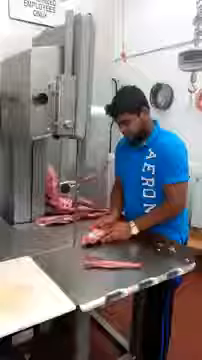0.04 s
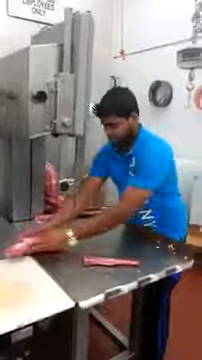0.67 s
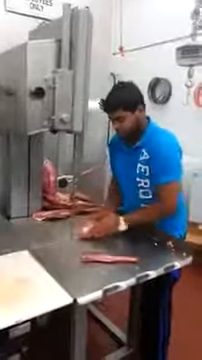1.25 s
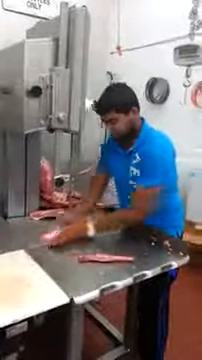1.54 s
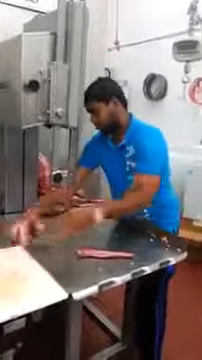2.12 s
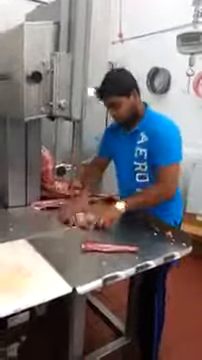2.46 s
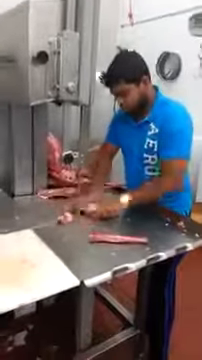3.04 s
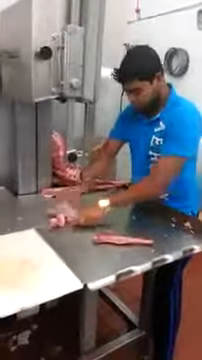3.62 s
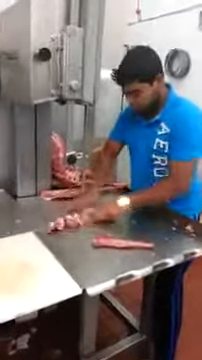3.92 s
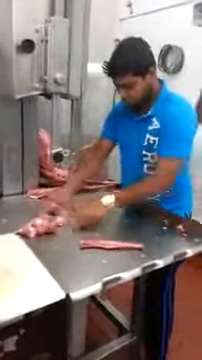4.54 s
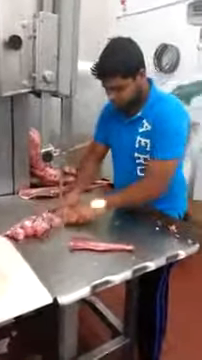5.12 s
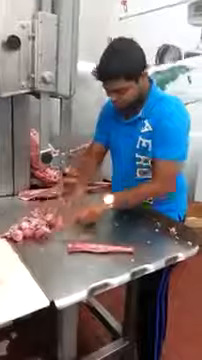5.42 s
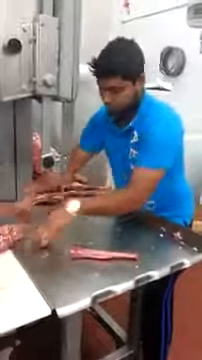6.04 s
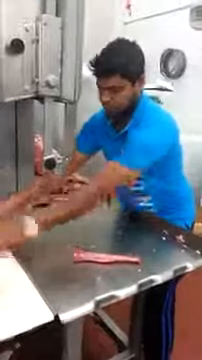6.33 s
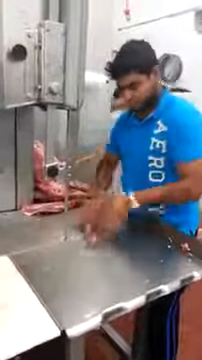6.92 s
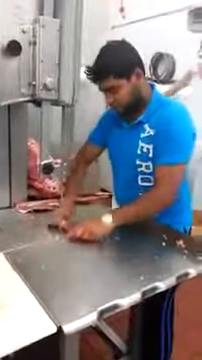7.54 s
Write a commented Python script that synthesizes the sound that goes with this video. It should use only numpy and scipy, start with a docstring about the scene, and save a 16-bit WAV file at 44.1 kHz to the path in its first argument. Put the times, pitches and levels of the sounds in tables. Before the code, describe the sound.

A butcher's band saw drones and hisses while bone is pushed through it in short, squealing rasps, with a few thumps on steel.

```python
"""Butcher's band saw in a tiled room.

The wheels drive the steel cabinet to a drone; belt and bearings whine, the blade hisses and whistles.
Bone is pushed through again and again: teeth rasp, the pinched blade squeals, the loaded drone sinks.
Soft flesh fizzes in the teeth; meat and bone thump on the steel table."""
import sys
import numpy as np
from scipy import signal
from scipy.fft import rfft, irfft, next_fast_len
from scipy.io import wavfile
from scipy.ndimage import uniform_filter1d, map_coordinates

SR = 44100
rng = np.random.default_rng(int(sys.argv[2]) if len(sys.argv) > 2 else 0)


def digitize_waveform(pressure):
    """Quantize a signal to 16-bit integers and store it at the path in sys.argv[1].

    Rows of a 2-D input are taken as channels; values are limited to [-1, 1].
    """
    field = np.atleast_2d(pressure).T
    bounded = np.clip(field, -1, 1)
    quanta = np.round(bounded * 32767).astype(np.int16)
    wavfile.write(sys.argv[1], SR, quanta)


N = 342657
TIME = np.arange(N) / SR

# cabinet drone before the load dip (time [s], level [dB])
FREE_DRONE = [(0.83, -16.5), (1.0, -31.5), (1.14, -16.5), (1.7, -19.5), (2.13, -27.5), (2.3, -14.5),
              (3.4, -16.5), (3.85, -16), (4.17, -13.5), (4.4, -17), (5.83, -18.5), (5.91, -10), (6.11, -9),
              (6.15, -12.5), (6.56, -22), (6.69, -10), (7.25, -10.5), (7.5, -16.5)]
# cabinet panels (frequency [Hz], width [Hz], gain [dB])
PANEL_MODES = [(228.2, 16, -2.5), (258, 19, 1), (288, 27, 7)]
# panel rattle (frequency [Hz], relative density [dB])
RATTLE_SPECTRUM = [(25, -42), (48, -48), (75, -13.5), (110, -15.5), (160, -3.5), (250, -2), (400, 0.5),
                   (460, 3.5), (490, 2.5), (540, 6), (600, 1.5), (650, -4.5), (1000, -0.5), (1250, -10),
                   (2000, -42)]
# bone on the blade (start [s], attack [s], hold [s], rasp [dB], squeal [dB], octave [dB], roughness [0-1])
BONE_CUTS = [ (1.322, .030, .030, -20, -38, -24, .4), (1.385, .035, .018, -10.5, -10.5, -10, .2),
             (1.462, .018, .018, -34, -19, -24, .05), (1.530, .040, .190, -30, -27, -31, .05),
             (1.590, .080, .012, -15, -28, -13.5, .3), (2.480, .010, .015, -28, -34, -33, .9),
             (2.698, .008, .048, -10.5, -14.5, -10.5, .65), (3.137, .004, .018, -8, -19, -11, .85),
             (3.185, .025, .015, -28, -19, -21, .4), (3.528, .005, .042, -12, -12.5, -11.5, .65),
             (3.830, .005, .005, -20, -35, -25, .95), (3.925, .040, .040, -12.5, -16, -20, .75),
             (4.372, .004, .026, -9.5, -17, -8, .7), (4.741, .008, .028, -9, -23, -11, .75),
             (4.870, .050, .090, -27, -29, -25, .15), (5.134, .008, .028, -11.5, -18, -15, .75),
             (5.563, .018, .055, -16.5, -18, -20, .6), (5.660, .030, .060, -30, -33, -21, .1),
             (7.595, .015, .025, -12.5, -14.5, -12, .65), (7.692, .004, .006, -18, -28, -30, .9)]
# teeth on bone (frequency [Hz], relative density [dB])
RASP_SPECTRUM = [(500, -29), (1700, 3.5), (2600, 3.5), (3400, 7), (4000, 12), (4500, 5.5), (5200, 0.5),
                 (7000, -1), (10000, -6), (13000, -4.5), (15000, -14)]
# blade resonances (frequency [Hz], width [Hz], gain [dB])
BLADE_MODES = [(2150, 225, 0), (4290, 260, 0), (6530, 110, -14)]
# higher blade modes that colour the rasp (frequency [Hz], width [Hz], gain [dB])
RASP_MODES = [(6480, 120, -3), (8650, 160, -3), (8950, 200, -4), (10640, 140, -4), (11100, 140, -7),
              (13000, 260, -10)]
# blade in its guides (frequency [Hz], relative density [dB])
HISS_SPECTRUM = [(600, -21.5), (1200, -0.5), (1550, 3.5), (1900, 0.5), (2150, 1), (2420, -2), (2790, 7.5),
                 (3150, 2.5), (3750, 2.5), (4300, -2), (5000, -9), (6500, -14.5), (10000, -21),
                 (12500, -19), (15000, -47)]
# blade pressed sideways on its guide (start [s], hold [s], whistle level [dB])
GUIDE_PRESSES = [(1.44, .14, -33), (2.76, .04, -34), (3.32, .13, -34), (5.17, .08, -34), (5.61, .07, -30)]
# drive tones (frequency [Hz], relative level [dB])
DRIVE_TONES = [(208, -38.5), (221, -29.5), (228, -30), (259, -41), (308, -29.5), (353, -34), (442, -39.5),
               (521, -37.5), (834.4, -35.5), (887, -43), (1007, -46), (1303, -36.5), (2503, -35)]
# wheel bearing whines (low [Hz], high [Hz])
BEARING_HZ = [1087.3, 1671.8]
# wheel bearing whines (time [s], low whine [dB], high whine [dB])
BEARING_LEVELS = [(0.83, -38, -30.5), (1.2, -32, -31), (1.6, -41, -35), (2.3, -32, -31), (2.8, -37, -36),
                  (5.6, -35, -34), (6.3, -26.5, -32), (7.4, -27.5, -30), (7.77, -34, -32.5)]
# meat and bone on the table (time [s], relative level [dB], hardness [0-1])
BLOWS = [(1.169, -13, 1), (2.742, -6.5, 0.14), (3.051, -14, 0), (5.79, -14, .6), (6.893, -14, 1)]
# steel table top (frequency [Hz], gain [dB], T60 [s])
TABLE_MODES = [(205, -29, 0.11), (265, 0.5, 0.22), (328, -23, 0.11), (464, 1, 0.063), (549, 1, 0.05),
               (792, -11.5, 0.13), (1050, -9, 0.054)]
# blade in soft flesh (start [s], end [s], level [dB])
FLESH_SLICES = [(0.805, 1.847, -35.5), (4.553, 5.1, -36), (6.25, 7.2, -43)]
# teeth in flesh (frequency [Hz], relative density [dB])
FIZZ_SPECTRUM = [(3000, -30), (5500, -1), (8000, 0), (11000, 1), (13500, -3), (15000, -2)]
# tiled room (frequency [Hz], T60 [s])
ROOM_DECAY = [(200, 0.3), (2000, 0.33), (5000, 0.43), (14000, 0.35)]
# left-right likeness of the machine noise (frequency [Hz], coherence [0-1])
COHERENCE = [(60, 0.8), (200, 0.95), (320, 0.78), (450, 0.91), (650, 0.51), (1390, 0), (3000, 0.015),
             (14000, 0.1)]

DRONE_HZ, RUMBLE_DB, RATTLE_DB = 294.5, -21, -20.5  # unloaded
SAG_HZ, DRONE_DIP_DB, PANEL_DIP_DB = 3.2, 7.5, 2  # drops at full load
FULL_LOAD_RASP_DB, LOAD_RISE_S, LOAD_HOLD_S, LOAD_FALL_S = -17, 0.032, 0.0849, 0.031
SQUEAL_HZ, DRAG_HZ = 2163, 45  # clean pitch, drop at full roughness
RASP_RELEASE_S, SQUEAL_RELEASE_S = 0.013, 0.018
WHISTLE_HZ, WHISTLE_DB, WHISTLE_SWELL_DB, WHISTLE_T60_S = 3343, -36.5, 7, 1.6
ONSET_S, CUTOFF_HZ = 0.819, 14650
AGC_THRESHOLD_DB, AGC_DB_PER_DB, AGC_WINDOW_S = -12, 0.35, 0.069


def cabinet(load):
    """Wheels drive the main resonance and shake loose panels; load lowers pitch and levels."""
    free_db, = curves(FREE_DRONE)
    phase = phase_of(DRONE_HZ - SAG_HZ * load + 0.74 * wobble(9))
    drone = amp(free_db - DRONE_DIP_DB * load + 0.92 * wobble(14)) * tone(phase, lead_rad=0.35)
    octave = amp(-32.5 + 3.8 * wobble(7)) * tone(2 * phase + 0.6 * wobble(16), lead_rad=0.36)
    rumble = amp(RUMBLE_DB - PANEL_DIP_DB * load) * ringing(PANEL_MODES)
    wheel_turn = np.sin(phase / 20)  # drone = 20th wheel order
    rattle_db = RATTLE_DB - PANEL_DIP_DB * load + 0.45 * wheel_turn + wobble(5)
    rattle = amp(rattle_db) * noise(lambda hz: amp(along(RATTLE_SPECTRUM, hz)))
    return (drone + rumble) * amp([[-.45], [.45]]) + (octave + rattle) * amp([[.4], [-.4]])


def saw_load():
    """Load, 0-1: grows with the rasp level, leads and outlasts each contact."""
    loads = []
    for start_s, attack_s, hold_s, rasp_db, *_ in BONE_CUTS:
        depth = min(1, amp(rasp_db - FULL_LOAD_RASP_DB))
        lead_in_s = start_s + attack_s / 2 - LOAD_RISE_S
        held_s = attack_s / 2 + hold_s + LOAD_HOLD_S
        loads.append(depth * pressure(lead_in_s, LOAD_RISE_S, held_s, LOAD_FALL_S))
    return np.max(loads, axis=0)


def tooth_rasp():
    """Teeth chip bone: dense noise bursts coloured by the blade's higher modes."""
    def response(f):
        modes = sum(amp(db) * resonance(f, hz, width_hz) for hz, width_hz, db in RASP_MODES)
        return amp(along(RASP_SPECTRUM, f)) * (1 + modes)

    level = sum(amp(cut[3]) * pressure(*cut[:3], RASP_RELEASE_S) for cut in BONE_CUTS)
    chips = rng.standard_normal((2, N)) * amp(3.2 * wobble(900) + 2.2 * wobble(160))
    return level * unit(filtered(chips, response))


def blade_squeal():
    """The pinched blade squeals; rough bone breaks the tone into random jolts of its modes."""
    pinches = np.array([pressure(*cut[:3], SQUEAL_RELEASE_S) for cut in BONE_CUTS])
    squeal_db, octave_db, roughness = np.transpose(BONE_CUTS)[4:]
    low_gain, high_gain = amp([squeal_db, octave_db]) @ pinches
    rough = roughness @ pinches / (pinches.sum(axis=0) + 1e-20)
    clean = np.clip(1 - rough, 0, 1)
    hoarse = np.sqrt(1 - clean ** 2)
    jitter = .025 * rough * wobble(250) + 0.0029 * wobble(40)
    phase = phase_of((SQUEAL_HZ - DRAG_HZ * rough) * (1 + jitter))
    low = clean * tone(phase, 0.94 * wobble(30)) + hoarse * ringing(BLADE_MODES[:1], lead_ms=0)
    overtones = tone(2 * phase, wobble(30)) + amp(-20) * tone(3 * phase, 2 * wobble(27))
    high = clean * overtones + hoarse * ringing(BLADE_MODES[1:], lead_ms=0)
    # released, the blade rings on in narrower lines
    free_modes = [(hz, width_hz / 2, db) for hz, width_hz, db in BLADE_MODES]
    low_tail = amp(-4) * ring_on(low_gain, t60_s=.55) * ringing(free_modes[:1])
    high_tail = amp(-11) * ring_on(high_gain, t60_s=.35) * ringing(free_modes[1:])
    return amp(-3) * (low_gain * low + high_gain * high) + low_tail + high_tail


def bone_cuts():
    """Rasp and squeal from straight ahead, with room reverb."""
    direct = tooth_rasp() + blade_squeal()
    direct = direct + 0.15 * direct[::-1]  # left-right crossfeed
    return direct + amp(-3.5) * room(direct)


def blade_guides(load):
    """The blade hisses and whistles in its guides; the whistle swells after cuts and under side pressure."""
    pressed = sum(amp(db) * pressure(start_s, attack_s=.06, hold_s=hold_s, release_s=.05)
                  for start_s, hold_s, db in GUIDE_PRESSES)
    level = amp(WHISTLE_DB + WHISTLE_SWELL_DB * ring_on(load, WHISTLE_T60_S)) + pressed
    flutter_db = .7 * wobble(25) + .4 * wobble(3)
    hiss = amp(-18.5 + flutter_db) * noise(lambda hz: amp(along(HISS_SPECTRUM, hz)))
    flicker = amp(1.5 * wobble(20))
    whistle = tone(phase_of(WHISTLE_HZ + 8 * wobble(36)), lead_rad=.8 + wobble(8))
    return hiss * amp([[.4], [-.4]]) + level * flicker * whistle


def drive():
    """Belt and bearing tones, wavering in level and pitch."""
    out = np.zeros((2, N))
    for hz, db in DRIVE_TONES:
        diffuse = 1 - along(COHERENCE, hz)
        waver_hz = (1 + hz / 700) * wobble(16)
        level = amp(db - 2 + 2.75 * wobble(6.6))
        out += level * tone(phase_of(hz + waver_hz), lead_rad=0.81 * diffuse * wobble(2.06))
    for hz, db in zip(BEARING_HZ, curves(BEARING_LEVELS)):
        level = amp(db + 1.5 * wobble(14))
        whine = tone(phase_of(hz + 1.5 * wobble(22)), lead_rad=.9 + .6 * wobble(2))
        out += level * whine * amp([[1], [-1.2]])
    return out


def table_thumps():
    """Blows ring the steel table; hard bone favours the higher modes."""
    out, t = np.zeros(N + SR), np.arange(SR // 2) / SR
    attack = 1 - np.exp(-t / 0.002)
    for start_s, blow_db, hardness in BLOWS:
        for hz, mode_db, t60_s in TABLE_MODES:
            tilt_db = 7 * hardness * np.log2(hz / 400)
            decay = amp(blow_db + 2 + mode_db + tilt_db - 60 * t / t60_s)
            out[round(start_s * SR):][:len(t)] += attack * decay * np.sin(2 * np.pi * hz * t)
    return out[:N] + amp(-20) * room(out[None, :N])


def flesh_fizz():
    """Teeth in soft meat: a fine, high fizz."""
    level = sum(amp(db) * pressure(start_s, attack_s=0.026, hold_s=end_s - start_s, release_s=0.054)
                for start_s, end_s, db in FLESH_SLICES)
    return level * amp(1.2 * wobble(20)) * noise(lambda hz: amp(along(FIZZ_SPECTRUM, hz)))


def room(x):
    """Diffuse reverb off tiled walls, independent per side."""
    hz, t, spectrum = signal.stft(rng.standard_normal((2, SR // 2)), SR, nperseg=256)
    decay = amp(-60 * t / along(ROOM_DECAY, hz)[:, None])
    tail = signal.istft(spectrum * decay, SR, nperseg=256)[1]
    return signal.fftconvolve(x, tail / np.linalg.norm(tail[0]), axes=1)[:, :N]


def amp(db):
    """dB to gain."""
    return 10 ** (np.asarray(db) / 20)


def unit(x):
    """Scale to rms 1."""
    return x / np.sqrt(np.mean(x ** 2) + 1e-20)


def along(points, hz):
    """Interpolate (frequency [Hz], value) on a log axis."""
    knots_hz, values = np.transpose(points)
    return np.interp(np.log(hz + 1), np.log(knots_hz + 1), values)


def curves(rows):
    """Per-sample curve for each column after the time."""
    times_s, *columns = np.transpose(rows)
    return [np.interp(TIME, times_s, column) for column in columns]


def wobble(rate_hz):
    """Smooth random curve through Gaussian knots."""
    return map_coordinates(rng.standard_normal(int(N * rate_hz / SR) + 4), [TIME * rate_hz])


def pressure(start_s, attack_s, hold_s, release_s):
    """Contact envelope, 0-1: quadratic rise, hold, exponential release."""
    rise = np.clip((TIME - start_s) / attack_s, 0, 1) ** 2
    return rise * np.exp(-np.maximum(TIME - start_s - attack_s - hold_s, 0) / release_s)


def ring_on(level, t60_s):
    """One-pole lag: a level decays freely once its drive stops."""
    pole = 10 ** (-3 / (t60_s * SR))
    return signal.lfilter([1 - pole], [1, -pole], level)


def phase_of(hz):
    """Running phase [rad], random start."""
    return 2 * np.pi * (np.cumsum(hz) / SR + rng.random())


def tone(phase, lead_rad):
    """Stereo sine, rms 1; left leads."""
    return np.sqrt(2) * np.sin([phase + lead_rad / 2, phase - lead_rad / 2])


def filtered(x, response):
    """Apply a frequency response by FFT."""
    size = next_fast_len(N + SR // 2)
    return irfft(rfft(x, size) * response(np.fft.rfftfreq(size, 1 / SR)), size)[..., :N]


def noise(response, lead_ms=.14):
    """Stereo noise, rms 1: coherent bass, diffuse treble; left leads."""
    def mid_side(hz):
        angle = np.arccos(along(COHERENCE, hz)) / 2
        return response(hz) * np.array([np.cos(angle), np.sin(angle)])

    mid, side = filtered(rng.standard_normal((2, N)), mid_side)
    right = filtered(mid - side, lambda hz: np.exp(-2j * np.pi * hz * lead_ms / 1000))
    return unit(np.array([mid + side, right]))


def resonance(hz, centre_hz, width_hz):
    """Causal response of one mode."""
    return 1j * hz * width_hz / (centre_hz ** 2 - hz ** 2 + 1j * hz * width_hz)


def ringing(modes, lead_ms=0.13):
    """Stereo noise in steep-sided resonances."""
    def response(f):
        return sum(amp(db) * abs(resonance(f, hz, width_hz)) ** 2 for hz, width_hz, db in modes)

    return noise(response, lead_ms)


def scene():
    """Running saw, cuts and table, in stereo."""
    load = saw_load()
    return cabinet(load) + drive() + blade_guides(load) + flesh_fizz() + bone_cuts() + table_thumps()


def record(dry):
    """Abrupt onset, gain control, soft clip, low-pass."""
    x = dry * np.clip((TIME - ONSET_S) / .002, 0, 1)
    power = uniform_filter1d(np.mean(x ** 2, axis=0), int(AGC_WINDOW_S * SR))
    level_db = 10 * np.log10(abs(power) + 1e-20)
    x = x * amp(-AGC_DB_PER_DB * np.maximum(level_db - AGC_THRESHOLD_DB, 0))
    x = x / (1 + abs(x) ** 8) ** (1 / 8)
    return filtered(x, lambda hz: hz < CUTOFF_HZ)


dry = scene()
out = record(dry)
digitize_waveform(out)
```